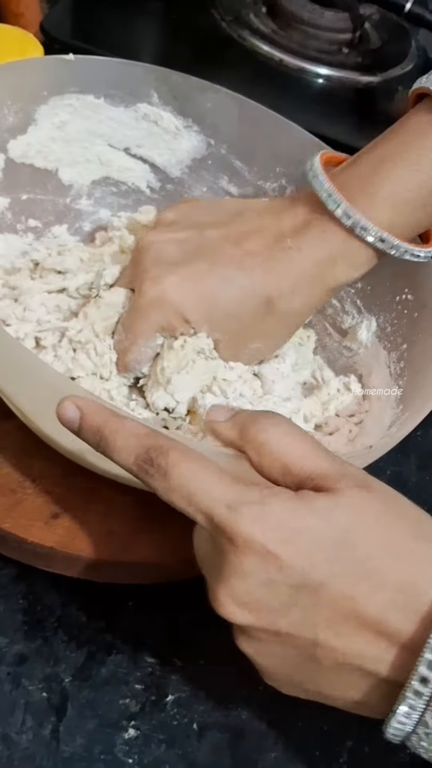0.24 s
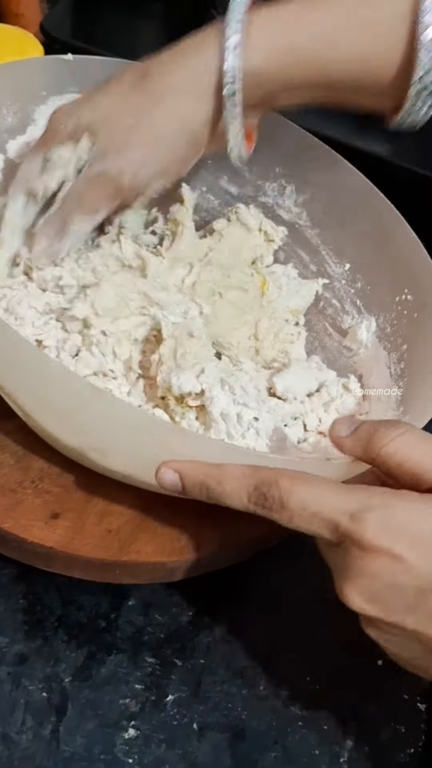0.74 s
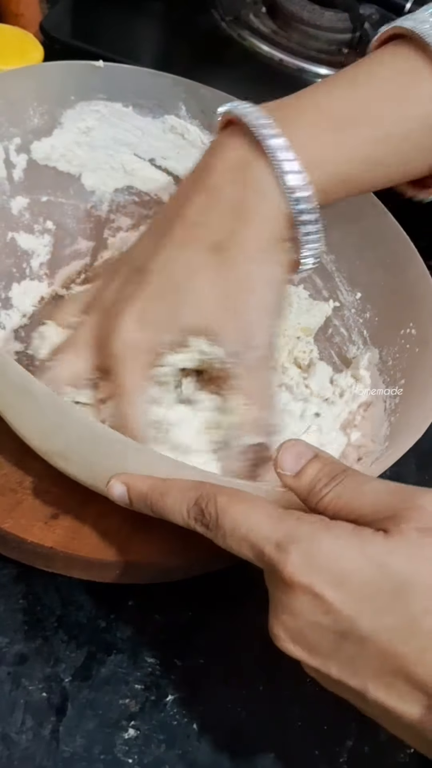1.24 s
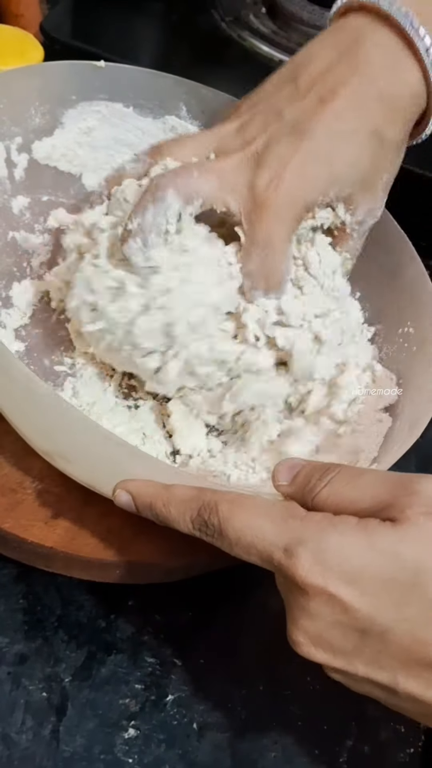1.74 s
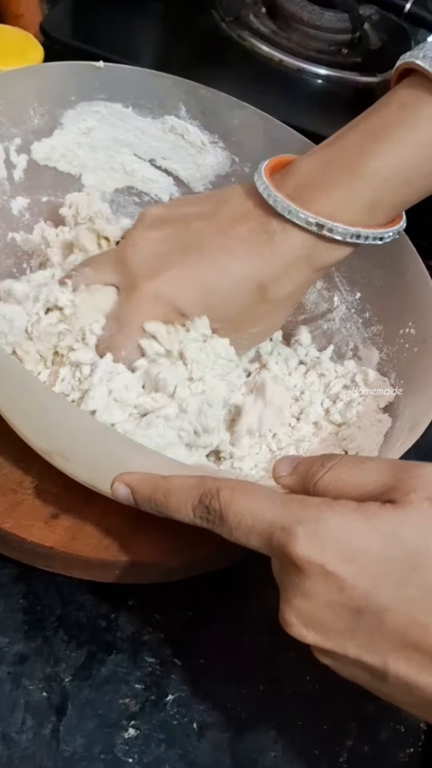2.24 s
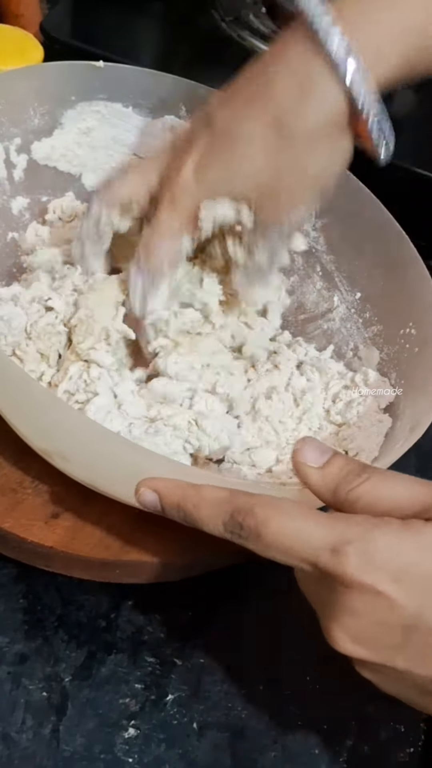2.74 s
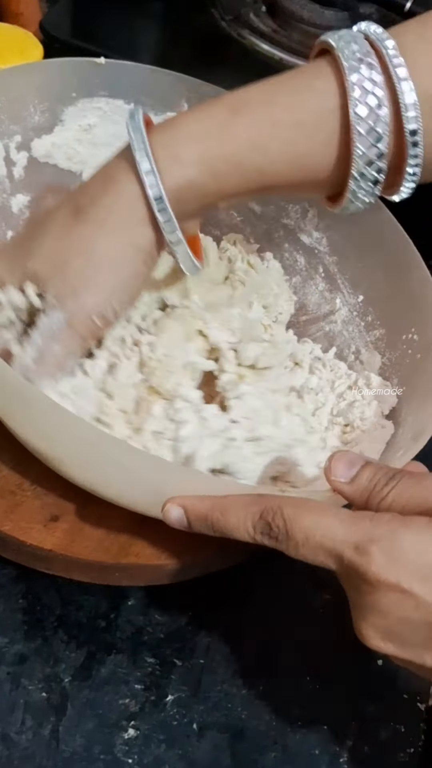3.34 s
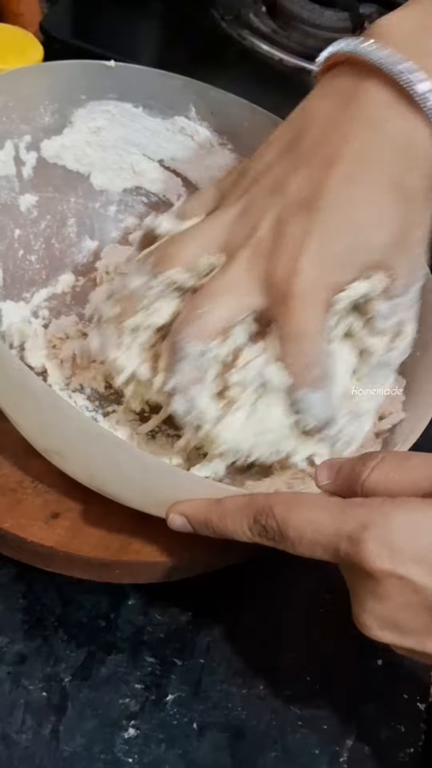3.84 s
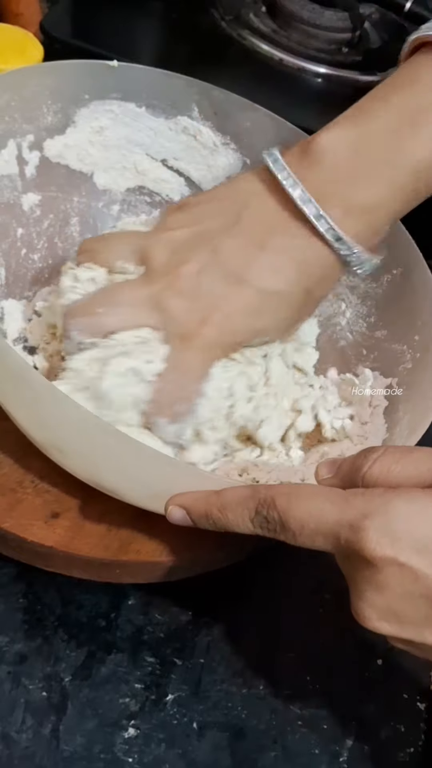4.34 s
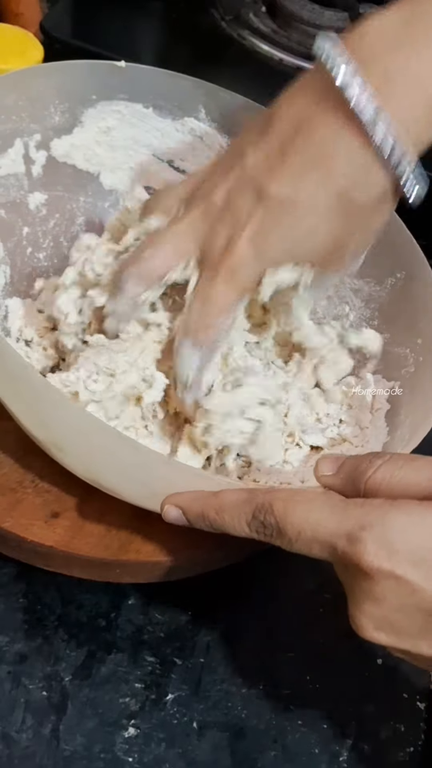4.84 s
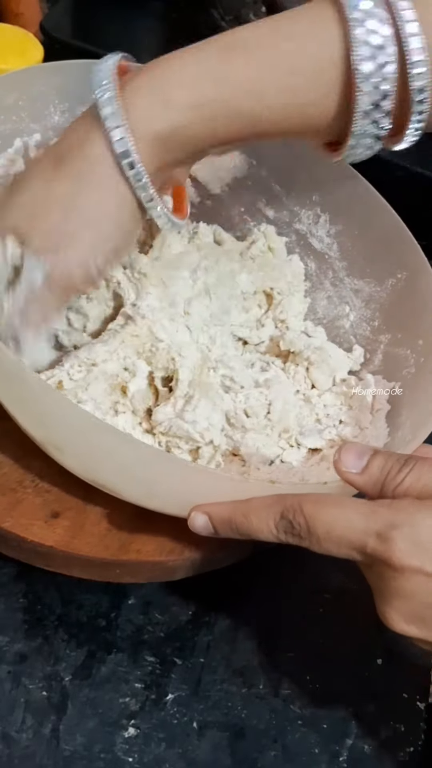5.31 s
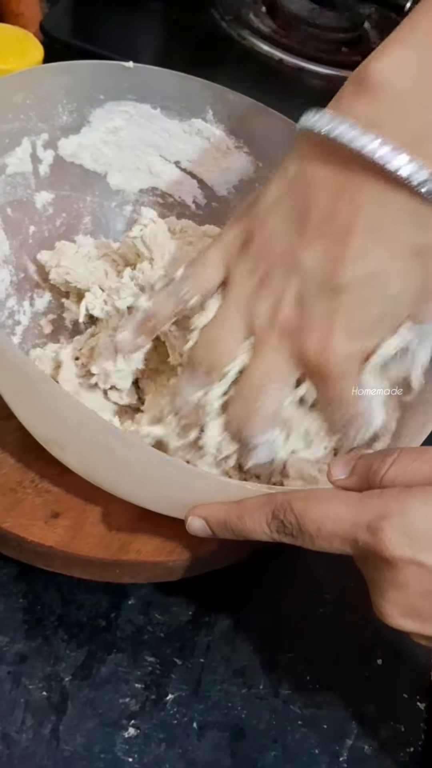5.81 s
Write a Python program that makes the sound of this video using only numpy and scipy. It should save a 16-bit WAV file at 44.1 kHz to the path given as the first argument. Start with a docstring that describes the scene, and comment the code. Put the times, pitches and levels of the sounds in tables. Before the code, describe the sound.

Soft, hissing strokes of dough being mixed by hand, a plastic bowl clacking and bumping, and a motor humming low.

```python
"""Working dough in a plastic bowl.

A hand rubs flour and water into crumbly dough in a small hard-walled kitchen. Three long strokes,
each a run of pushes, and some light touches hiss with countless tiny slips. The bowl is knocked,
thumped and dragged on its board, so its wall clacks and rings; a few dry crumbs snap. A motor hums low
and swells near the end, over dull room noise, a narrow band of high hiss and faint whistles."""
import sys
import numpy as np
from scipy import signal
from scipy.fft import rfft, irfft
from scipy.io import wavfile

SR = 44100
rng = np.random.default_rng(int(sys.argv[2]) if len(sys.argv) > 2 else 0)


def file_out(sig):
    """Save sig as 16-bit WAV at sys.argv[1]."""
    # one column per channel
    cols = np.atleast_2d(sig).T
    # limit, then scale
    lim = np.clip(cols, -1, 1)
    pcm = np.round(lim * 32767).astype(np.int16)
    wavfile.write(sys.argv[1], SR, pcm)


N = 267687
TIME = np.arange(N) / SR
FREQS = np.fft.rfftfreq(N, 1 / SR)

# pushes through the dough: t/s, rise/s, hold/s, rub level/dB, flour level/dB
HAND_PUSHES = [(0.0, 0.0027, 0.011, -70.5, -79), (0.26, 0.086, 0.16, -83.5, -78.5),
               (0.699, 0.034, 0.03, -57, -68), (0.818, 0.06, 0.066, -55, -62.5),
               (1.043, 0.053, 0.081, -60.5, -68.5), (1.224, 0.035, 0.15, -70, -74),
               (1.846, 0.031, 0.024, -75.5, -74.5), (1.955, 0.0091, 0.016, -59.5, -88),
               (2.05, .05, 0.067, -74, -82), (2.544, 0.05, .12, -100, -80.5),
               (3.006, 0.0092, 0.097, -60.5, -71), (3.122, .13, 0.066, -58, -65.5),
               (3.424, 0.073, 0.055, -63.5, -72.5), (4.002, 0.12, 0.034, -71, -72),
               (4.294, 0.03, 0.088, -78, -88), (4.75, .05, .01, -95, -83), (5.187, 0.05, 0.096, -57.5, -72),
               (5.25, 0.084, 0.23, -60, -64), (5.568, 0.024, 0.012, -58.5, -71),
               (5.65, 0.033, 0.11, -71.5, -72.5), (5.942, 0.038, .03, -80, -85)]
# friction spectra of damp dough and dry flour: f/Hz, level/dB
RUB_SPECTRUM = [(200, -38), (600, 5.5), (1200, -0.5), (2400, 2.5), (3500, -2), (5000, -4), (6600, -9.5),
                (8000, -17), (16000, -14.5)]
FLOUR_SPECTRUM = [(1500, -10), (4000, -4.5), (6500, 6.5), (8000, -6.5), (10000, 2.5), (12500, 2.5),
                  (15000, 0), (17000, -31)]


def hand(rub_gain_db=5.0, flour_gain_db=5.0):
    """Damp dough rubs broadly and dry flour hisses high; both fade as the hand lets up."""
    rub_env = gestures([(*timing, db) for *timing, db, _ in HAND_PUSHES], fade_db_per_s=94)
    flour_env = gestures([(*timing, db) for *timing, _, db in HAND_PUSHES], fade_db_per_s=91)
    hollows = hand_hollows()
    rub = friction(RUB_SPECTRUM, slips_per_s=9000, spread_db=0.78, uneven_db=0.053) + hollows
    flour = friction(FLOUR_SPECTRUM, slips_per_s=23000, spread_db=1.3, uneven_db=0.31)
    return reflected(from_db(rub_gain_db) * rub_env * rub + from_db(flour_gain_db) * flour_env * flour)


def friction(spectrum, slips_per_s, spread_db, uneven_db):
    """Countless tiny slips of unequal size; the level wavers as crumbs roll under the hand."""
    slips = (rng.random((2, N)) < slips_per_s / SR) * rng.standard_normal((2, N))
    slips *= from_db(spread_db * rng.standard_normal((2, N)))
    return colour(slips, from_db(at_hz(spectrum, FREQS))) * from_db(uneven_db * drift(12))


# resonances of the cupped hand: f/Hz, width/Hz, level/dB
HAND_HOLLOWS = [(1500, 200, -10), (2330, 300, -12), (2950, 350, -13), (3400, 450, -14), (4450, 600, -18)]


def hand_hollows(waver_db=3):
    """Resonant noise comes and goes as the hollow of the hand opens and closes."""
    return sum(from_db(db) * unit_rms(band(hz, width_hz) * from_db(waver_db * drift(9)))
               for hz, width_hz, db in HAND_HOLLOWS)


# paths via bowl wall and worktop: delay/s, level/dB
NEAR_PATHS = [(.0014, -10), (.0037, -4.5)]


def reflected(direct, path_spread=0.051, move_hz=1.6):
    """Close reflections colour the rubbing at equal power; their paths shift as the hand moves."""
    total = direct
    for delay_s, db in NEAR_PATHS:
        late = [np.interp(TIME - delay_s * (1 + path_spread * drift(move_hz)), TIME, x) for x in direct]
        total = total + from_db(db) * np.array(late)
    return total * direct.std() / total.std()


# drags on the bowl's wall: t/s, rise/s, hold/s, level/dB
WALL_DRAGS = [(0.02, 0.005, 0.0061, -48), (0.235, 0.065, 0.012, -51), (0.708, 0.018, 0.013, -48.5),
              (0.77, 0.024, 0.033, -54.5), (0.85, 0.076, 0.052, -49), (1.15, 0.16, 0.056, -61.5),
              (1.955, 0.0085, 0.022, -51), (2.08, 0.088, 0.013, -48), (3.0, 0.062, 0.093, -55),
              (3.24, 0.074, .015, -50.5), (4.02, 0.086, .05, -58.5), (5.22, 0.057, 0.073, -47.5),
              (5.38, .06, 0.14, -53.5)]
# their friction spectrum: f/Hz, level/dB
DRAG_SPECTRUM = [(120, 0.5), (300, 2), (650, 3), (900, 2), (1200, -1.5), (1480, -1.5), (1900, -5),
                 (2600, -24), (5000, -40)]
# modes of the bowl on its board: f/Hz, level/dB, t60/s
BOWL_MODES = [(252, -7, .45), (330, -9, .32), (401, -7, .38), (502, -4, .25), (579, -4, .3), (632, -1, .37),
              (680, 0, .3), (784, -12, .2), (902, -11, .2), (943, -11, .28), (1152, -14, .2),
              (1338, -13, .2), (1460, -11, .22), (1590, -11, .24), (1742, -6, .22), (2015, -13, .2),
              (2200, -16, .24), (2310, -12, .22), (2430, -12, .18), (3450, -18, .14)]


def drags(wall_db=-8):
    """The hand bears down and drags on the wall; the slips ring the bowl."""
    slips = friction(DRAG_SPECTRUM, slips_per_s=4000, spread_db=0.62, uneven_db=0.69)
    wall = from_db(wall_db) * unit_rms(ring(slips, BOWL_MODES))
    return gestures(WALL_DRAGS, fade_db_per_s=133) * (slips + wall)


# blows on the bowl: t/s, level/dB, rebound re blow/dB, contact cutoff/Hz (low for flesh and dough),
# struck spot f/Hz, spot flex/dB, weight on board/dB, pan/dB (added left, taken off right)
BOWL_BLOWS = [(0.002, -40, 0.5, 1770, 886, 10, -6, 3), (0.725, -36.5, -3, 880, 796, 3, 1, 5.5),
              (1.963, -38.5, -8, 1900, 1430, 11, -1, 5), (2.331, -29.5, -13, 2960, 588, 4.5, -28, 7),
              (3.002, -45.5, 5, 1060, 650, 5, -5, 4.5), (3.536, -33, -26, 780, 316, 6, 3.5, 3),
              (3.548, -27.5, -8, 455, 395, -10.5, 6.5, 13), (4.186, -30, -11.5, 2880, 620, 6, -30, 5.5),
              (4.309, -46, -16, 1480, 750, 4.5, -8, 11.5), (5.459, -42, -8, 294, 256, 7.5, 6, 0.5),
              (5.652, -38, -5, 312, 288, 7.5, -14, 1)]


def blows(rebound_s=0.022, cutoff_ratio=0.69):
    """After each blow the bowl rocks and lands again with a duller contact."""
    firsts = [(s, db, hz, *rest) for s, db, _, hz, *rest in BOWL_BLOWS]
    rebounds = [(s + rebound_s, db + rebound_db, hz * cutoff_ratio, *rest)
                for s, db, rebound_db, hz, *rest in BOWL_BLOWS]
    return firsts + rebounds


# heavily damped wall modes: f/Hz, level/dB, t60/s
CLACK_MODES = [(453, -1, 0.012), (870, 1, 0.0037), (1414, -14.5, 0.036), (1690, 2, 0.0038),
               (2295, -4, 0.014), (3560, -6.5, 0.0076), (5050, 2, 0.0024)]
# board and worktop modes: f/Hz, level/dB, t60/s
BOARD_MODES = [(118.7, -5, 0.54), (165, -10, 0.032), (251, -22, 0.19)]


def knocks(ring_db=-9, clack_db=3, board_db=3, spot_t60_cycles=14, ring_echo_db=-11):
    """Each blow is a force pulse; it flexes the struck spot, rings the bowl and shakes the board."""
    on_bowl, on_board, clacks = np.zeros(N), np.zeros(N), np.zeros((2, N))
    for s, db, contact_hz, spot_hz, spot_db, weight_db, pan_db in blows():
        start = round(s * SR)
        span = slice(start, start + SR // 5)
        force = contact(from_db(db) * signal.unit_impulse(len(TIME[span])), contact_hz)
        flex = ring(force, [(spot_hz, spot_db, spot_t60_cycles / spot_hz)])
        clack = flex + from_db(clack_db) * ring(force, CLACK_MODES)
        clacks[:, span] += clack * from_db([[pan_db], [-pan_db]])
        on_bowl[span] += force
        on_board[span] += force * from_db(weight_db + board_db)
    bowl = from_db(ring_db) * ring(on_bowl, BOWL_MODES)
    echo = kitchen(clacks.mean(axis=0) + from_db(ring_echo_db) * bowl)
    return clacks + bowl + ring(on_board, BOARD_MODES) + echo


def contact(impulse, contact_hz, edge_hz=2550, leak_db=-10):
    """A soft contact rounds the pulse; the plastic swallows most of what lies above edge_hz."""
    force = butter(impulse + 1e-18, 2, contact_hz, "low")
    return butter(force, 8, edge_hz, "low") + from_db(leak_db) * butter(force, 8, edge_hz, "high")


# snaps of dry crumbs: t/s, level/dB
CRUMB_SNAPS = [(1.818, -71), (1.869, -58), (1.964, -54), (2.331, -64), (2.734, -61), (3.013, -56)]


def crumbs(decay_s=0.0016, highpass_hz=4500, echo_db=-4):
    """A crumb breaks with a very short burst of bright noise."""
    envelope = sum(from_db(db) * (TIME >= s) * np.exp(-np.minimum(abs(TIME - s) / decay_s, 20))
                   for s, db in CRUMB_SNAPS)
    snaps = butter(envelope * rng.standard_normal(N), 2, highpass_hz, "high")
    return snaps + from_db(echo_db) * kitchen(snaps)


# echo spectrum: f/Hz, level/dB
ECHO_SPECTRUM = [(100, 4), (300, 9), (600, 5), (1200, 8.5), (2200, 5.5), (4000, 15.5), (12000, -8.5)]
# echo decay: f/Hz, t60/s
ECHO_DECAY = [(100, 0.31), (500, 0.34), (2000, 0.45), (4000, 0.28), (14000, 0.42)]


def kitchen(source, build_s=0.00043):
    """Hard walls return a diffuse echo that builds quickly and dies band by band."""
    t, response = TIME[:SR // 2], 0
    edges_hz = np.geomspace(70, 16000, 14)
    for low, high in zip(edges_hz, edges_hz[1:]):
        hz = np.sqrt(low * high)
        noise = butter(rng.standard_normal((2, len(t))), 2, [low, high], "band")
        fall_db = -60 * t / at_hz(ECHO_DECAY, hz)
        response += stereo(*noise, hz) * from_db(at_hz(ECHO_SPECTRUM, hz) + fall_db)
    response = unit_rms(response * (1 - np.exp(-t / build_s))) / np.sqrt(len(t))
    return signal.fftconvolve(response, source[None], axes=1)[:, :N]


# main hum, rising near the end: t/s, level/dB
HUM_CURVE = [(0, -51.5), (4.9, -52), (5.8, -44)]


def motor(drone_db=-56, waver_db=2.4):
    """Two low tones waver in pitch and level, each in a skirt of rumble."""
    hum = tone(118.3, wander_hz=1.895, rate_hz=7.9) * from_db(waver_db * drift(17))
    hum = hum + from_db(-5) * band(123.6, width_hz=37)
    drone = tone(82, wander_hz=3.32, rate_hz=8.3) * from_db(waver_db * drift(13))
    drone = drone + from_db(-7) * band(79.4, width_hz=44)
    hum_db = np.interp(TIME, *np.transpose(HUM_CURVE))
    return from_db(hum_db) * unit_rms(hum) + from_db(drone_db) * unit_rms(drone)


# room noise spectrum: f/Hz, level/dB
AIR_SPECTRUM = [(25, -8), (45, -42), (65, 4.5), (100, 14.5), (160, 1.5), (330, -2.5), (520, -1.5),
                (800, -10.5), (1500, -21.5), (3000, -32.5), (5000, -37.5), (9000, -41), (13000, -37.5),
                (17000, -40)]
# narrow bands in it: f/Hz, width/Hz, level/dB
ROOM_BANDS = [(199, 1.8, -63), (240.2, 6.6, -70.5), (275.8, 1.3, -72), (322.6, 19, -66.5),
              (427.4, 12.6, -66.5), (526.7, 1.7, -67.5)]


def room_noise(air_db=-54):
    """Dull steady noise with narrow low bands in it."""
    air = from_db(air_db) * colour(rng.standard_normal((2, N)), from_db(at_hz(AIR_SPECTRUM, FREQS)))
    return air + sum(from_db(db) * band(hz, width_hz) for hz, width_hz, db in ROOM_BANDS)


def high_hiss(level_db=-74, flutter_hz=9.8, flutter_rms_db=2.2):
    """A narrow band of high hiss whose level flutters."""
    hiss = band(7170, width_hz=440)
    return hiss * from_db(level_db + flutter_rms_db * tone(flutter_hz, wander_hz=0.47, rate_hz=3.0))


# faint whistles: t/s, rise/s, hold/s, level/dB, f/Hz
THIN_WHISTLES = [(2.826, 0.15, 0.4, -73.5, 3600), (2.9, 0.069, .02, -84, 3900), (3.38, .05, .02, -73, 2290)]


def whistles(flicker_db=4):
    """Thin unsteady tones swell, flicker and die slowly."""
    tones = sum(swell(*shape, fade_db_per_s=35) * tone(hz, wander_hz=41.9, rate_hz=146)
                for *shape, hz in THIN_WHISTLES)
    return tones * from_db(flicker_db * drift(38))


# left-right likeness: f/Hz, correlation before clipping
STEREO_LIKENESS = [(30, -1), (70, 2.1), (130, 0.8), (290, 0.72), (640, 0.34), (1400, -0.18), (3000, 0),
                   (15000, -0.32)]
# left minus right: f/Hz, level/dB
STEREO_BALANCE = [(60, -7.5), (200, 2.5), (380, -2.5), (700, -0.1), (1300, 0.6), (4400, -1.1), (8000, -0.1),
                  (11000, 5.5), (15000, 2)]


def stereo(mid, side, hz):
    """Left and right from two unrelated signals: alike near 100 Hz, barely related in the treble."""
    alike = np.clip(at_hz(STEREO_LIKENESS, hz), -.99, .99)
    sign = np.array([[1], [-1]])
    pair = np.sqrt(1 + alike) * mid + sign * np.sqrt(1 - alike) * side
    return pair * from_db(sign * at_hz(STEREO_BALANCE, hz) / 2)


def colour(pair, gain):
    """Shape two white signals into stereo of unit power."""
    return unit_rms(irfft(stereo(*(rfft(pair) * gain), FREQS), N))


def band(hz, width_hz):
    """Noise in one narrow resonance."""
    return colour(rng.standard_normal((2, N)), 1 / (1 + ((FREQS - hz) / (width_hz / 2)) ** 2))


def ring(force, modes):
    """Decaying modes driven by a force; neighbours swing in opposite senses, with no steady pressure."""
    total = 0
    for k, (hz, db, t60_s) in enumerate(modes):
        radius, angle = from_db(-60 / (t60_s * SR)), 2 * np.pi * hz / SR
        mode = signal.lfilter([.5, 0, -.5], [1, -2 * radius * np.cos(angle), radius ** 2], force + 1e-18)
        total += (-1) ** k * from_db(db) * mode
    return total


def swell(start_s, rise_s, hold_s, db, fade_db_per_s):
    """Gain of one gesture: smooth rise, hold, even fall in dB."""
    t = TIME - start_s
    attack = np.sin(np.pi / 2 * np.clip(t / rise_s, 0, 1)) ** 2
    return attack * from_db(db - fade_db_per_s * np.maximum(t - rise_s - hold_s, 0))


def gestures(rows, fade_db_per_s):
    """Overlapping gestures add in power."""
    return np.sqrt(sum(swell(*row, fade_db_per_s) ** 2 for row in rows))


def tone(hz, wander_hz, rate_hz):
    """Unit-power sine of wandering pitch."""
    return np.sqrt(2) * np.sin(2 * np.pi * np.cumsum(hz + wander_hz * drift(rate_hz)) / SR)


def drift(rate_hz):
    """Unit-power random wander, mostly below rate_hz."""
    return unit_rms(irfft(rfft(rng.standard_normal(N)) / (1 + (FREQS / rate_hz) ** 2), N))


def butter(x, order, hz, kind):
    """Maximally flat filter."""
    return signal.sosfilt(signal.butter(order, hz, kind, fs=SR, output="sos"), x)


def at_hz(points, hz):
    """Read a curve on a log-frequency axis."""
    f, value = np.transpose(points)
    return np.interp(np.log(np.maximum(hz, 1)), np.log(f), value)


def from_db(db):
    """Decibels to gain."""
    return 10 ** (np.asarray(db) / 20)


def unit_rms(x):
    """Scale to unit power."""
    return x / np.sqrt(np.mean(x ** 2) + 1e-20)


def scene():
    """Bowl and hand in the humming kitchen."""
    return knocks() + crumbs() + hand() + drags() + motor() + room_noise() + high_hiss() + whistles()


def record(dry):
    """Steep low-pass on the top treble."""
    cutoff_hz = 15740
    return signal.sosfilt(signal.ellip(12, .1, 70, cutoff_hz, fs=SR, output="sos"), dry)


dry = scene()
out = record(dry)
file_out(out)
```